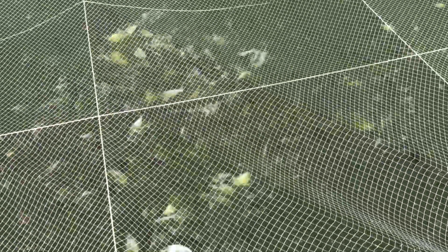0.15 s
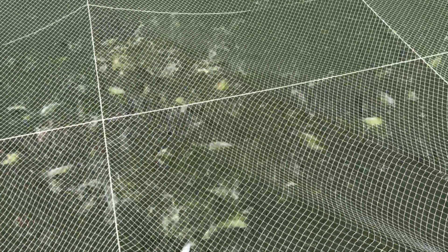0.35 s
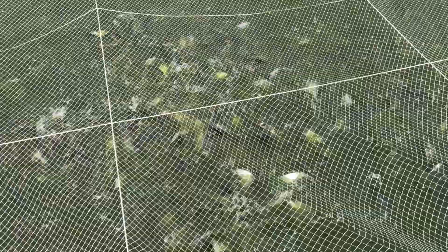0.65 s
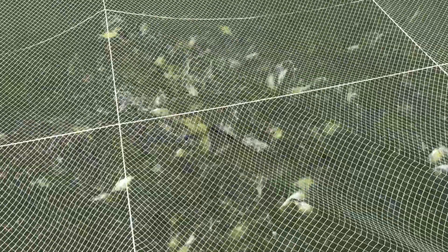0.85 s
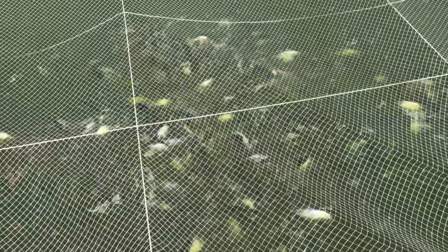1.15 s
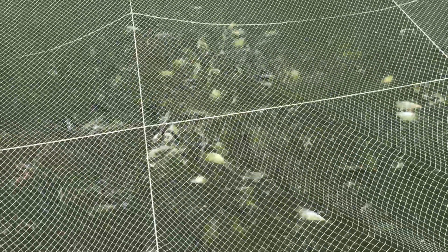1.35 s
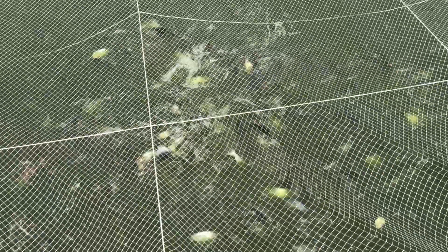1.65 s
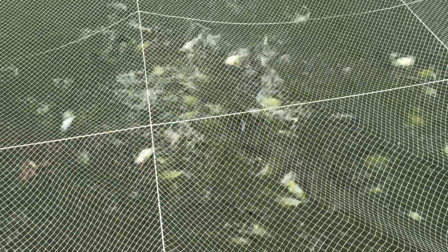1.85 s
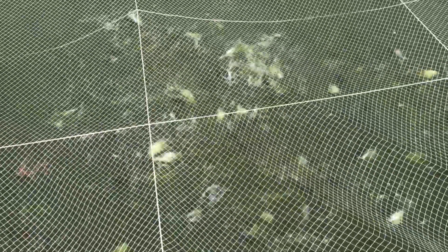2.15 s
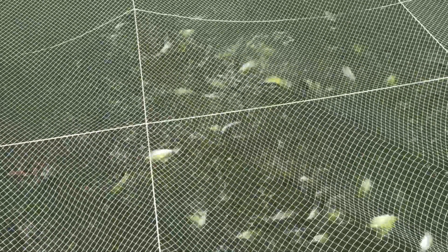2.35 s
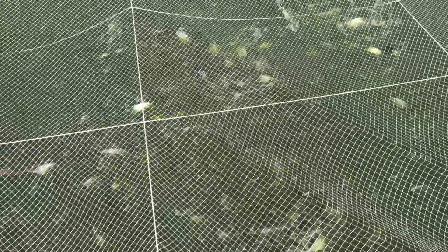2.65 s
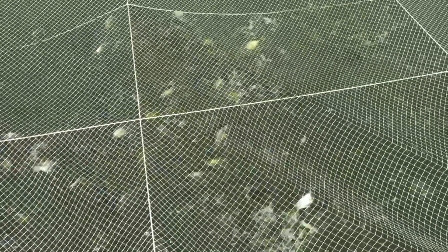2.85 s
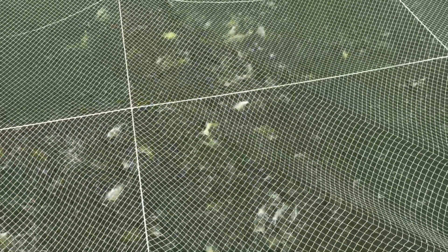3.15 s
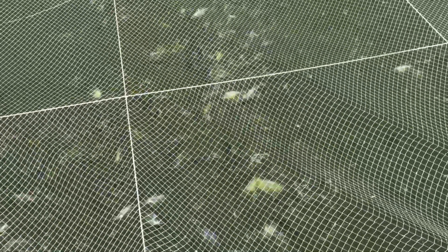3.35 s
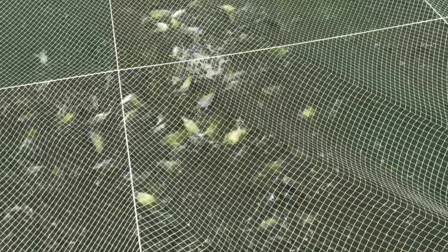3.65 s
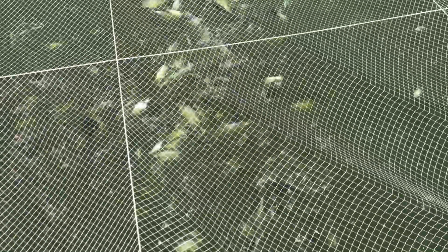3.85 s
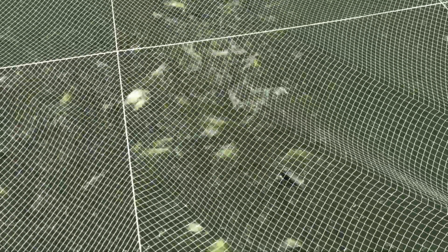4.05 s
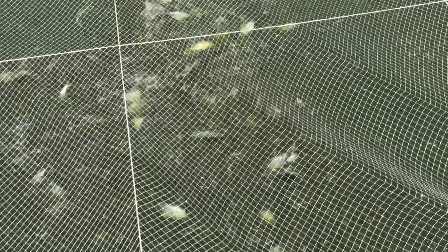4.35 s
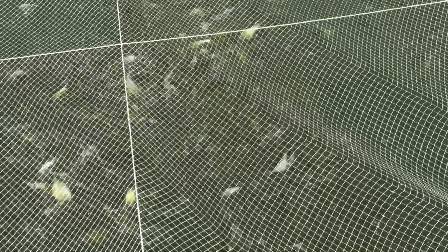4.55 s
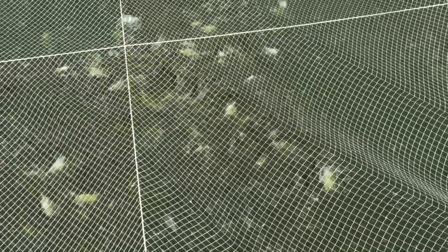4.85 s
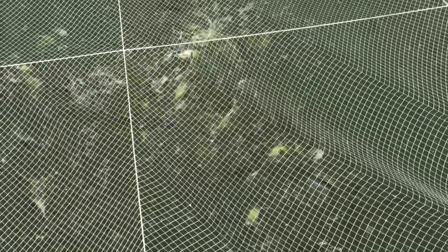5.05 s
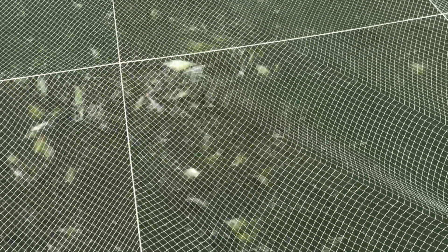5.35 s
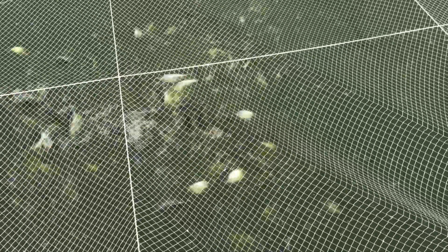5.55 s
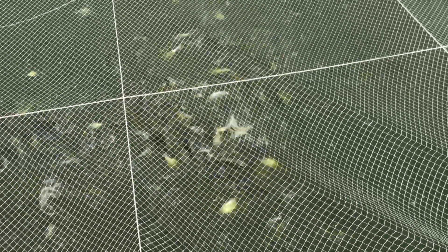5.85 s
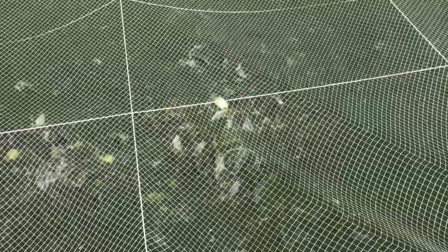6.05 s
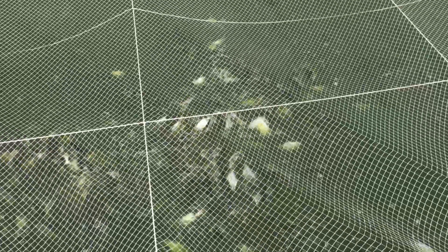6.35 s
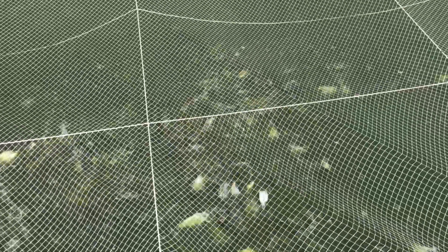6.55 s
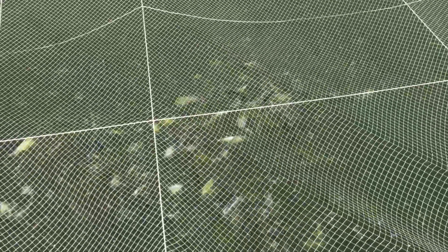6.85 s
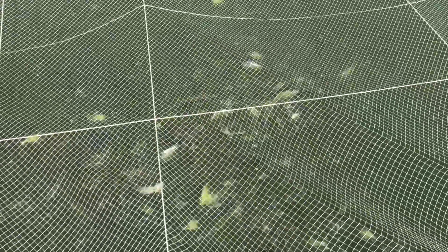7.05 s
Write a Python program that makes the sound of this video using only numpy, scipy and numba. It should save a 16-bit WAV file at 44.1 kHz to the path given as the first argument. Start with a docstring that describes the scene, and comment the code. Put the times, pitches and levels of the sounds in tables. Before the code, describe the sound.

Many small fish splash and churn the water with bubbly plops, while wind gusts rumble and thump on the microphone.

```python
"""Fish feeding in a gusty breeze

Many small fish feed at the surface of a pond: mouths and tails trap bubbles that ring, most of them
rising in pitch, and tail slaps throw up spray whose droplets tick back onto the water.
Gusts buffet a hand-held microphone with a lumpy rumble and short, low thumps."""
import sys
import numpy as np
from scipy import signal
from scipy.fft import rfft, irfft
from scipy.io import wavfile
from scipy.ndimage import uniform_filter1d
from numba import njit

SR = 44100
rng = np.random.default_rng(int(sys.argv[2]) if len(sys.argv) > 2 else 0)


def wav_record(signal):
    """Record a signal, one row per channel, as 16-bit PCM in the file named by sys.argv[1]."""
    frames = np.transpose(np.atleast_2d(signal))
    bounded = np.clip(frames, -1, 1)
    # unit amplitude maps onto the largest positive 16-bit level
    quanta = np.round(bounded * 32767).astype(np.int16)
    wavfile.write(sys.argv[1], SR, quanta)


N = 317961

# Foreground bubbles: t/s, level/dB, starting f/Hz, glide/(octaves per s), t60/s
PLOP_HITS = [(0.017, -36.5, 602, 48.5, 0.24), (0.415, -24, 2880, 2, 0.012), (0.461, -30, 3220, 10, 0.016),
             (0.478, -33, 1200, 9, 0.04), (0.504, -30, 1200, 3, 0.04), (0.698, -27.5, 3000, 9, 0.022),
             (0.717, -30, 3900, 10, 0.016), (0.771, -31.5, 910, 3, 0.063), (0.778, -37, 550, 7.5, 0.11),
             (0.927, -35, 1193, -2, 0.067), (0.989, -28, 2600, 3, 0.019), (1.005, -39.5, 400, 16, 0.19),
             (1.042, -10, 1720, 9, 0.0052), (1.052, -28.5, 852, 2.5, 0.091), (1.123, -32, 457, 29, 0.027),
             (1.137, -27, 3600, 20, 0.012), (1.232, -21, 2190, 2, 0.022), (1.2777, -24.5, 4600, 10, 0.014),
             (1.377, -39, 550, 40.5, 0.34), (1.44, -22, 1040, 24, 0.016), (1.542, -14, 2350, 30, 0.0084),
             (1.577, -15, 1310, 6, 0.01), (1.628, -18, 1530, -4, 0.01), (1.711, -23.5, 900, -6, 0.021),
             (1.752, -31, 1085, 22, 0.056), (1.778, -33, 634, 34, 0.11), (1.788, -35, 1140, 6, 0.13),
             (1.842, -25, 2110, 6, 0.02), (1.86, -36.5, 372, -2, 0.067), (1.961, -14, 2580, 0, 0.0056),
             (1.99, -27, 4450, 10, 0.013), (2.026, -24, 1600, 5, 0.022), (2.054, -14, 625, 47, 0.0032),
             (2.091, -27, 1110, 21, 0.028), (2.131, -39, 396, 31, 0.055), (2.165, -20.5, 1900, -4, 0.015),
             (2.207, -24.5, 2300, 2, 0.022), (2.492, -41, 440, 2.5, 0.32), (2.506, -23.5, 1670, -8, 0.025),
             (2.529, -10, 1680, 4, 0.0033), (2.553, -28.5, 1014, 14, 0.04), (2.62, -25, 1090, -3, 0.025),
             (2.658, -30, 4270, 42, 0.012), (2.663, -26.5, 1780, -30, 0.032),
             (2.6993, -23, 4500, 57, 0.018), (2.7515, -27, 4130, 11, 0.014), (2.881, -27.5, 2950, 5, 0.017),
             (2.893, -37, 380, 46, 0.26), (2.935, -29, 2240, -4, 0.036), (3.007, -27.5, 1360, 25, 0.04),
             (3.182, -26, 856, 0, 0.033), (3.3, -29, 3800, 10, 0.014), (3.385, -34, 1030, -5, 0.041),
             (3.451, -27, 806, 0, 0.027), (3.6445, -27.5, 1465, 5, 0.041), (3.677, -25, 2280, 62, 0.014),
             (3.704, -26, 1840, 5, 0.02), (3.761, -24, 800, 45, 0.035), (3.789, -27.5, 1030, -4, 0.061),
             (3.848, -22, 2400, 30, 0.0071), (3.883, -21, 513, 20, 0.012), (3.91, -24, 1130, 0, 0.015),
             (3.919, -22, 3900, 15, 0.013), (4.103, -26.5, 1270, 7, 0.026), (4.121, -32.5, 788, 45, 0.064),
             (4.175, -29, 1370, 12, 0.041), (4.176, -30, 964, -1, 0.062), (4.231, -17, 2850, 36, 0.0087),
             (4.349, -39.5, 677, 15, 0.44), (4.379, -23, 4470, 10, 0.0063), (4.455, -24, 3060, 5, 0.015),
             (4.457, -33.5, 776, 22, 0.17), (4.534, -22, 3330, -20, 0.012), (4.558, -26, 1470, 8, 0.018),
             (4.57, -27, 2080, 3, 0.016), (4.853, -17.5, 1670, 0, 0.012), (4.878, -38, 794, 33, 0.067),
             (4.918, -35, 860, 5.5, 0.11), (5.085, -34.5, 947, 10, 0.096), (5.035, -32, 910, 4, 0.045),
             (5.062, -22, 1750, 2, 0.011), (5.104, -28, 2440, 13, 0.016), (5.214, -30.5, 3340, 10, 0.02),
             (5.199, -42, 382, 27.5, 0.12), (5.224, -31, 720, 34.5, 0.072),
             (5.31, -30.5, 1110, 15.5, 0.073), (5.4015, -28, 2430, 101, 0.018), (5.508, -47, 810, 19, 0.14),
             (5.581, -23, 1630, 43, 0.018), (5.584, -28, 1160, 44.5, 0.039), (5.605, -40, 860, -6, 0.06),
             (5.74, -28, 1850, 5, 0.018), (5.791, -25, 2450, 0, 0.012), (5.959, -28, 690, -6, 0.022),
             (6.001, -21, 1370, 41, 0.019), (6.088, -31.5, 845, 37, 0.04), (6.12, -26.5, 2160, 6, 0.023),
             (6.14, -31, 1520, 21, 0.034), (6.16, -33, 1270, 5, 0.02), (6.162, -36, 845, -1, 0.05),
             (6.244, -29.5, 2580, 1, 0.022), (6.263, -28, 780, 43, 0.025), (6.264, -28, 1340, 20, 0.025),
             (6.264, -32, 2230, -6, 0.027), (6.275, -20, 4560, 30, 0.009), (6.432, -31, 2180, 1.5, 0.053),
             (6.563, -32, 1166, 13, 0.091), (6.591, -23, 2650, 5, 0.0097), (6.687, -26, 2300, 5, 0.014),
             (6.7515, -29, 4020, 42, 0.018), (6.759, -28, 1740, -7, 0.03), (6.817, -24, 2910, 30, 0.014),
             (6.843, -27, 1720, 44, 0.015), (6.859, -33.5, 1520, 3, 0.041),
             (6.887, -23.5, 3780, -12, 0.0091), (6.937, -30, 1110, 5, 0.025), (7.072, -17, 1290, 42, 0.012),
             (7.0845, -29, 7300, 10, 0.01), (7.102, -28.5, 1920, 22, 0.018), (7.137, -28, 794, 53, 0.03),
             (7.151, -30, 2170, 10, 0.017)]


def plops():
    """A trapped bubble starts with a wet snap, rings, and drags a gurgle of three quieter ones along."""
    onset, level_db, hz, glide, t60 = np.transpose(PLOP_HITS)
    out = np.zeros(N)
    ring_bubbles(out, np.c_[onset, from_db(level_db), hz, glide, t60])
    capped_db = np.minimum(level_db, -27)  # snap and gurgle stay soft under the loudest plops
    for lag, pitch, size, rise in rng.random((len(onset), 3, 4)).transpose(1, 2, 0):
        gurgle_hz = np.maximum(hz * 2 ** (1.5 * (pitch - .4)), 500)
        life_s = 25.4 / gurgle_hz
        gain = from_db(capped_db - 11 + 9 * (size - .5))
        ring_bubbles(out, np.c_[onset + .025 * lag, gain, gurgle_hz, .9 * rise / life_s, life_s])
    snaps = np.c_[onset, capped_db - 12, 2 * hz]
    return out + wet_cracks(snaps, t60=.0074, grit_db=-6, width=.67, broad=.19)


@njit
def ring_bubbles(out, rows):
    """Add bubbles to out: dying sines that glide as they near the surface. Rows hold a linear gain."""
    for onset, gain, hz, glide, t60 in rows:
        start, phase = int(onset * SR), 0.
        attack_s = min(.0012, t60 / 8)
        for i in range(min(int(t60 * SR), len(out) - start)):
            t = i / SR
            phase += 2 * np.pi * min(hz * 2 ** (glide * t), SR / 2) / SR
            attack = 1 - np.exp(-t / attack_s)
            out[start + i] += gain * attack * 10 ** (-3 * t / t60) * np.sin(phase)


# Splashy tail hits: t/s, level/dB, centre f/Hz
SLAP_HITS = [(0.25, -25, 4480), (0.423, -27.5, 3800), (0.5277, -26.5, 3500), (0.611, -32, 4610),
             (1.3803, -23, 5840), (2.0248, -33, 9360), (2.137, -29, 7040), (2.5282, -32, 5920),
             (2.6582, -29, 4760), (2.6866, -30, 9200), (2.7511, -35, 4040), (2.8709, -27.5, 3620),
             (3.1138, -30.5, 6300), (3.327, -34, 5200), (3.4725, -32.5, 5000), (3.6105, -25.5, 4500),
             (3.6765, -25, 4700), (3.748, -35, 3660), (3.788, -32, 8900), (3.8843, -28, 8770),
             (3.9828, -26, 4340), (4.0382, -30, 4200), (4.2313, -41, 4080), (4.9038, -33, 5590),
             (5.1277, -32, 5770), (5.4105, -23, 6500), (6.2577, -34, 4300), (6.2755, -33, 6500),
             (6.4527, -30.5, 5200), (6.6323, -32, 4000), (7.1217, -36, 3650)]


def tail_slaps():
    """A tail smacks the surface and throws a brief, gritty spatter."""
    return wet_cracks(SLAP_HITS, t60=.024, grit_db=7.5, width=.2, broad=.52)


# Single falling drops: t/s, relative level/dB, centre f/Hz
DROP_HITS = [(0.17, -26.5, 6500), (0.429, -30, 8900), (0.8407, -27, 6900), (0.8766, -28, 11100),
             (1.1385, -25, 5900), (1.2046, -26, 8000), (1.3812, -33, 6200), (1.6215, -26, 12300),
             (1.7828, -29, 7300), (1.8227, -36, 8700), (1.842, -30, 8100), (1.8654, -30, 11600),
             (1.9583, -30, 8900), (1.9936, -29, 9300), (2.0261, -22, 9500), (2.1389, -27, 8100),
             (2.2614, -26, 11300), (2.273, -27, 8600), (2.3912, -30, 10400), (2.5687, -30, 7000),
             (2.6876, -25, 8900), (2.7514, -28, 6700), (2.7651, -28, 8600), (3.6111, -28, 11900),
             (3.6144, -22, 7540), (3.7403, -25, 10700), (3.7552, -28, 9400), (3.761, -27, 11700),
             (3.7895, -33, 7700), (3.8865, -31, 9700), (3.9796, -25.5, 7700), (4.0062, -29, 10500),
             (4.2325, -29, 9100), (4.2992, -30, 9000), (4.3797, -24, 5400), (4.4334, -28, 10300),
             (4.6957, -27, 11000), (4.754, -29, 9900), (4.9047, -29, 5900), (5.0639, -30, 9800),
             (5.2552, -28, 7400), (5.3742, -29, 10600), (5.4109, -30, 8100), (5.4151, -22, 6750),
             (5.4189, -21.5, 9800), (5.7056, -31, 9800), (5.7878, -30, 8900), (6.5465, -28, 8800),
             (6.6501, -26.5, 12600), (6.8655, -24, 13200)]


def drop_ticks():
    """Drops land back on the water, each with a tight, bright tick."""
    return from_db(-1.4) * wet_cracks(DROP_HITS, t60=.0067, grit_db=-1, width=.45, broad=.21)


def wet_cracks(rows, t60, grit_db, width, broad):
    """Sharp noise bursts through a resonance (width: share of its Hz); broad mixes in the raw burst."""
    out = np.zeros(N)
    size = 2600
    t = np.arange(size) / SR
    for (onset, level_db, hz), (white, grain) in zip(rows, rng.standard_normal((len(rows), 2, size))):
        grit = from_db(grit_db * grain.repeat(20)[:size])
        burst = white * grit * 10 ** (-3 * t / t60)
        r = np.exp(-np.pi * width * hz / SR)
        ring = signal.lfilter([1, 0, -1], [1, -2 * r * np.cos(2 * np.pi * hz / SR), r * r], burst)
        crack = ring / np.abs(ring).max() + broad * burst / np.abs(burst).max()
        start = round(onset * SR)
        out[start:start + size] += (from_db(level_db) * crack)[:N - start]
    return butter(out, 2, 1800, "high")


# Fader rides of the feeding: t/s, churn level/dB, spray level/dB
FEEDING_RIDE = [(0.0, -40.5, -46.5), (0.64, -42.5, -46), (1.4, -44, -48.5), (1.57, -41.5, -45),
                (1.79, -40.5, -43.5), (2.01, -39.5, -42.5), (2.1, -40.5, -43.5), (2.33, -44, -49.5),
                (2.47, -40, -46.5), (2.7, -41.5, -47), (2.82, -45.5, -50.5), (3.19, -44.5, -50.5),
                (3.57, -43.5, -48.5), (3.84, -40.5, -45), (4.28, -43.5, -46), (5.1, -45.5, -50),
                (5.72, -47, -49.5), (6.53, -44.5, -49), (7.07, -48, -54), (7.21, -49.5, -56.5)]
# Tone of the splashing water: f/Hz, relative level/dB
WATER_EQ = [(250, -17), (400, -11.5), (600, -6), (900, -0.5), (1700, 0), (3000, -7), (5000, -13.5),
            (9000, -16), (16000, -20)]


def feeding_bed():
    """Bubbles, droplets and the blur of far splashes swell with the feeding."""
    churn_db, spray_db = in_time(FEEDING_RIDE)
    bubbles = swarm(2400, low_hz=331, high_hz=3806, cycles=22, spread_db=2.5, rise=.78, clump_db=3)
    droplets = swarm(14000, low_hz=2743, high_hz=15940, cycles=13.7, spread_db=3.5, rise=.47, clump_db=4)
    wash = coloured(WATER_EQ) * from_db(2.5 * drift(39.4))
    low_wash = butter(wash, 2, 3500, "low")
    churn = from_db(-3.5) * bubbles + from_db(-2.5) * rms_one(low_wash)
    spray = from_db(-.5) * droplets + from_db(2.68) * rms_one(wash - low_wash)
    return from_db(churn_db) * churn + from_db(spray_db) * spray


def swarm(count, low_hz, high_hz, cycles, spread_db, rise, clump_db):
    """Random bubbles born in clumps, each climbing by up to rise octaves as it dies; rms 1."""
    births = np.cumsum(from_db(clump_db * drift(14)))
    when, pitch, size, life, glide = rng.random((count, 5)).T
    onset = np.searchsorted(births, when * births[-1]) / SR
    hz = low_hz * (high_hz / low_hz) ** pitch
    t60 = cycles * (.77 + 1.26 * life) / hz
    accent_db = -spread_db * np.log(np.maximum(size, .03))  # a few poke out of the crowd
    gain = from_db(at_hz(WATER_EQ, hz) + accent_db) * hz / 1000
    out = np.zeros(N)
    ring_bubbles(out, np.c_[onset, gain, hz, rise * glide / t60, t60])
    return rms_one(out)


# Tone of the wind's deep rumble: f/Hz, relative level/dB
RUMBLE_EQ = [(20, -30), (32, -14.5), (45, 2), (65, 0), (95, -2.5), (140, -16)]
# Tone of the buffeting just above it: f/Hz, relative level/dB
BUFFET_EQ = [(100, -6.5), (140, 1), (200, -9.5), (280, -17.5), (400, -27.5), (600, -39.5)]


def wind():
    """Air hits the microphone: two bands of low noise, pushed by the breeze and the gusts."""
    rumble_gain, buffet_gain = gusts(*breeze())
    rumble = compress(coloured(RUMBLE_EQ), window_s=.036)
    buffet = compress(coloured(BUFFET_EQ), window_s=.0171)
    return rumble_gain * rumble + buffet_gain * buffet


# Gusts that strike the microphone port: t/s, hold/s, rumble level/dB, buffet level/dB
GUST_HITS = [(0.418, 0.023, -37.5, -62), (1.522, 0.012, -43, -35.5), (1.545, 0.062, -30.5, -55),
             (1.884, 0.064, -41, -63), (2.072, 0.056, -41.5, -56), (2.392, 0.053, -39, -63),
             (2.665, 0.018, -39, -39.5), (2.735, 0.033, -28.5, -33), (2.761, 0.02, -29, -33),
             (2.845, 0.086, -44, -51), (3.347, 0.033, -37, -58.5), (3.849, 0.022, -29.5, -39),
             (3.898, 0.017, -30, -33.5), (3.968, 0.11, -29.5, -39.5), (3.997, 0.029, -36, -31),
             (4.17, 0.024, -37, -58), (4.266, 0.032, -31.5, -40.5), (4.368, 0.046, -30, -38),
             (4.471, 0.014, -43, -40.5), (4.59, 0.023, -31.5, -33), (4.69, 0.038, -29.5, -34),
             (4.74, 0.041, -28, -36), (4.865, 0.055, -28, -39.5), (5.014, 0.039, -30, -34),
             (5.063, 0.02, -35, -34), (5.107, 0.024, -32, -51), (5.207, 0.021, -32, -36),
             (5.271, 0.065, -29.5, -35.5), (5.382, 0.024, -32, -33), (5.447, 0.019, -34, -38),
             (5.603, 0.072, -33, -42.5), (5.7, 0.052, -29, -34.5), (6.319, 0.012, -38.5, -41.5),
             (6.542, 0.032, -34, -29.5), (6.618, 0.035, -27, -32.5), (6.67, 0.061, -28, -22.5),
             (6.723, 0.082, -31, -28), (6.825, 0.015, -32, -43), (6.886, 0.015, -31, -29),
             (6.965, 0.019, -29, -25.5), (7.004, 0.012, -24, -23), (7.056, 0.02, -25, -27.5),
             (7.086, 0.025, -26, -26.5), (7.106, 0.039, -22, -29), (7.191, 0.023, -33, -34)]


def gusts(rumble_gain, buffet_gain, swell_db_per_s=1200, die_db_per_s=702):
    """Each gust swells, holds and dies, taking over the two gains wherever it tops them."""
    t = np.arange(N) / SR
    for onset, hold, rumble_db, buffet_db in GUST_HITS:
        near = slice(max(int((onset - .1) * SR), 0), int((onset + hold + .1) * SR))
        early = np.maximum(onset - t[near], 0)
        late = np.maximum(t[near] - onset - hold, 0)
        envelope = from_db(-swell_db_per_s * early - die_db_per_s * late)
        rumble_gain[near] = np.maximum(rumble_gain[near], from_db(rumble_db) * envelope)
        buffet_gain[near] = np.maximum(buffet_gain[near], from_db(buffet_db) * envelope)
    return rumble_gain, buffet_gain


# The hardest eddies: centre t/s, level/dB, f/Hz
EDDY_HITS = [(1.525, -20, 99), (2.68, -25, 76), (2.723, -29.5, 340), (2.733, -20, 77.5), (2.781, -26.5, 73),
             (4.015, -16, 96.5), (4.384, -27, 106), (4.488, -21, 68.6), (4.711, -16.5, 83.5),
             (4.747, -24, 90), (5.735, -19.5, 73), (6.549, -18.5, 124), (6.57, -22, 61.3),
             (6.647, -13, 72.6), (6.679, -13, 86), (6.712, -21, 164), (6.796, -20, 169), (6.889, -28, 229),
             (6.921, -20.5, 89), (7.006, -21, 188), (7.028, -16.5, 77.4), (7.117, -14.5, 217),
             (7.133, -17.5, 109)]


def eddy_thumps(cycles=3.04):
    """An eddy throbs at a pitch of its own: a few cycles that fade smoothly in and out."""
    out = np.zeros(N + SR)
    for (centre, level_db, hz), phase in zip(EDDY_HITS, rng.random(len(EDDY_HITS))):
        size = int(cycles / hz * SR)
        start = int(centre * SR) - size // 2
        tone = np.sin(2 * np.pi * (hz * np.arange(size) / SR + phase))
        out[start:start + size] += from_db(level_db) * np.hanning(size) * tone
    return out[:N]


# Fader ride of the breeze under the gusts: t/s, rumble level/dB
BREEZE_RIDE = [(0, -50), (1.4, -49), (1.75, -55), (2.1, -49), (2.25, -55.5), (2.6, -40), (2.7, -41),
               (2.83, -50), (2.95, -42.5), (3.3, -50.5), (3.75, -46.5), (3.86, -36.5), (5.46, -35),
               (5.55, -53), (5.66, -31.5), (5.85, -51.5), (6.48, -49), (6.56, -30), (6.87, -52),
               (7.21, -27.5)]


def breeze(calm_db=-65):
    """Rumble and buffet gains of a breeze that throbs in random lumps; the buffet sits well under."""
    breeze_db, = in_time(BREEZE_RIDE)
    lumps = drift(21)
    rumble_gain = from_db(breeze_db + 1.8 * lumps)
    flutter = from_db(2.45 * lumps + 2.8 * drift(24))
    buffet_gain = (from_db(calm_db) + from_db(breeze_db - 19)) * flutter
    return rumble_gain, buffet_gain


def compress(x, window_s, amount=.71):
    """Even out part of the noise's own level swing; rms 1."""
    level = np.sqrt(uniform_filter1d(x ** 2, int(window_s * SR)) + .02)
    return rms_one(x / level ** amount)


def coloured(eq):
    """Steady noise shaped by an EQ curve, silent beyond its ends; rms 1."""
    hz = np.maximum(np.arange(N // 2 + 1) * SR / N, 1)
    in_band = (hz >= eq[0][0]) & (hz <= eq[-1][0])
    return rms_one(irfft(rfft(rng.standard_normal(N)) * from_db(at_hz(eq, hz)) * in_band, N))


def drift(rate_hz):
    """Random modulator: twice low-passed noise, drawn at every 20th sample; rms 1."""
    r = np.exp(-40 * np.pi * rate_hz / SR)
    slow = signal.lfilter([1], [1, -2 * r, r * r], rng.standard_normal(N // 20 + 2002))[2000:]
    return np.interp(np.arange(N) / 20, np.arange(len(slow)), rms_one(slow))


def in_time(ride):
    """Each level column of a fader ride, sample by sample."""
    times, *columns = np.transpose(ride)
    return [np.interp(np.arange(N) / SR, times, column) for column in columns]


def at_hz(eq, hz):
    """An EQ curve's dB, read on a log-frequency axis."""
    points_hz, points_db = np.transpose(eq)
    return np.interp(np.log(hz), np.log(points_hz), points_db)


def butter(x, order, hz, kind):
    """Plain high- or low-pass."""
    return signal.sosfilt(signal.butter(order, hz, kind, fs=SR, output="sos"), x)


def from_db(db):
    """Decibels to gain."""
    return 10 ** (np.asarray(db) / 20)


def rms_one(x):
    """Scale to rms 1."""
    return x / np.sqrt(np.mean(x ** 2) + 1e-20)


def scene():
    """Water and wind at one microphone."""
    water = feeding_bed() + plops() + tail_slaps() + drop_ticks()
    return (water + wind() + eddy_thumps())[None]


# Treble dips of the microphone housing: f/Hz, width/Hz, level/dB
HOUSING_EQ = [(4920, 97, -4.5), (7640, 1200, -3.5), (10400, 940, -5)]


def record(dry, low_cut_hz=37, high_cut_hz=15750):
    """The deepest bass rolls off, the housing cuts three shallow treble dips, and the top is cut off."""
    out = butter(dry, 3, low_cut_hz, "high")
    for hz, width, dip_db in HOUSING_EQ:
        b, a = signal.iirpeak(hz, hz / width, fs=SR)
        out = out - (1 - from_db(dip_db)) * signal.lfilter(b, a, out)
    return signal.sosfilt(signal.ellip(12, .5, 60, high_cut_hz, fs=SR, output="sos"), out)


dry = scene()
out = record(dry)
wav_record(out)
```